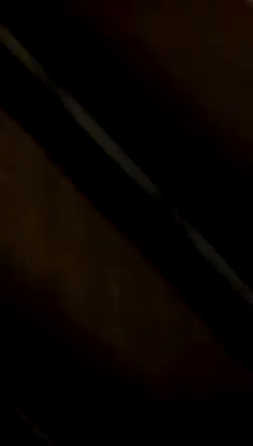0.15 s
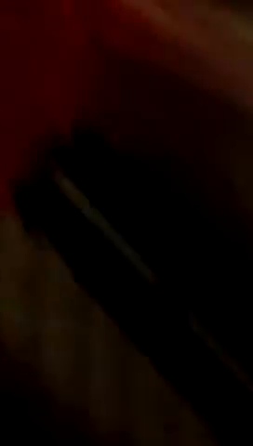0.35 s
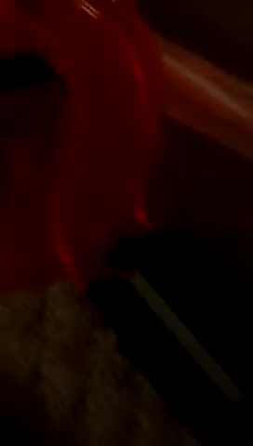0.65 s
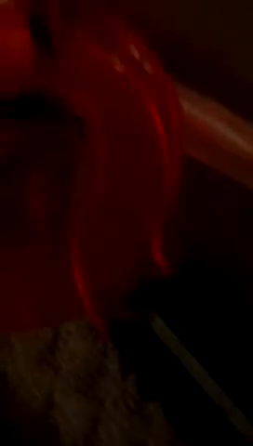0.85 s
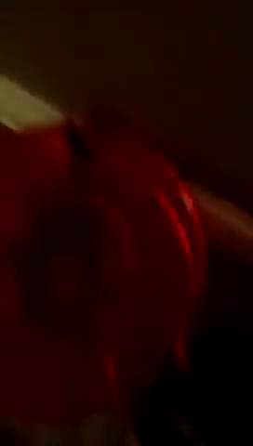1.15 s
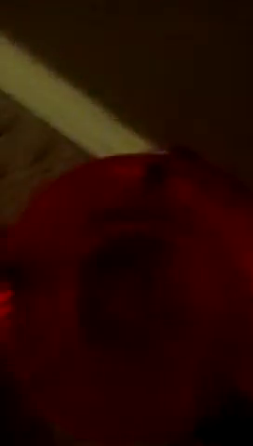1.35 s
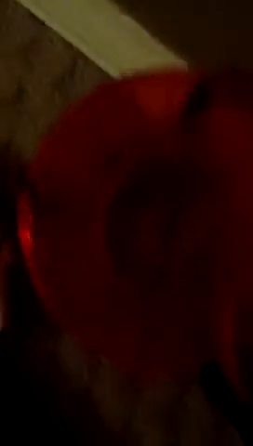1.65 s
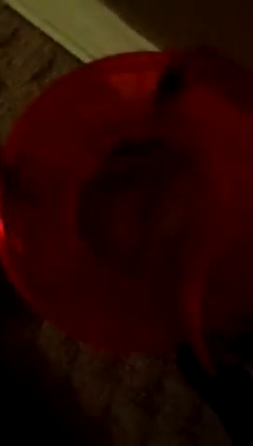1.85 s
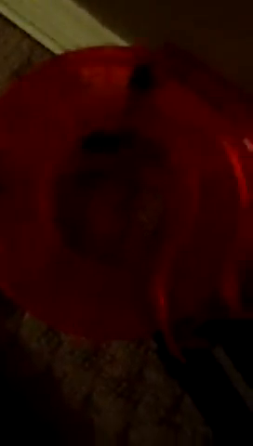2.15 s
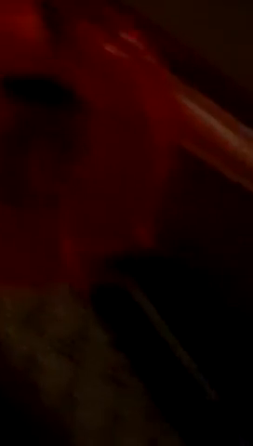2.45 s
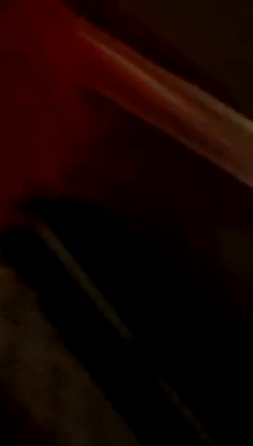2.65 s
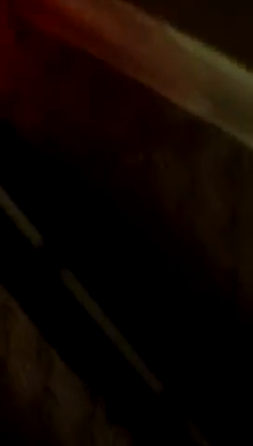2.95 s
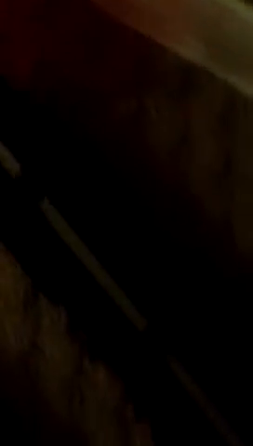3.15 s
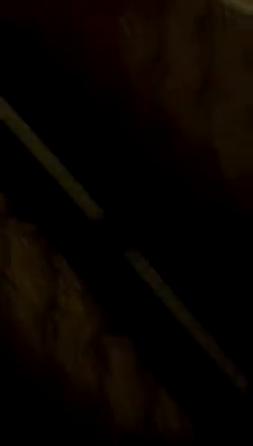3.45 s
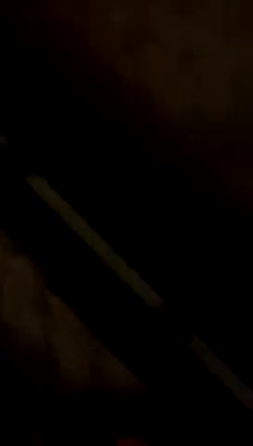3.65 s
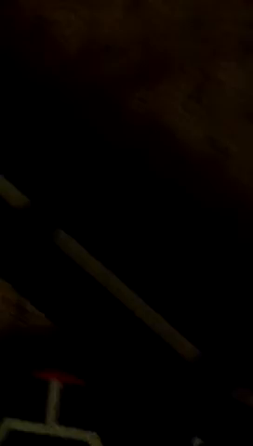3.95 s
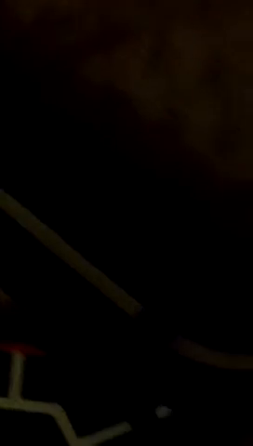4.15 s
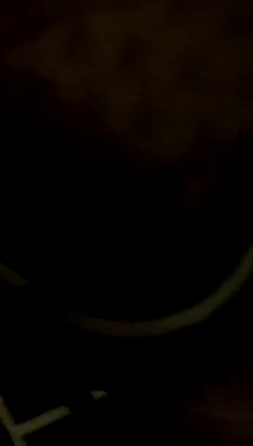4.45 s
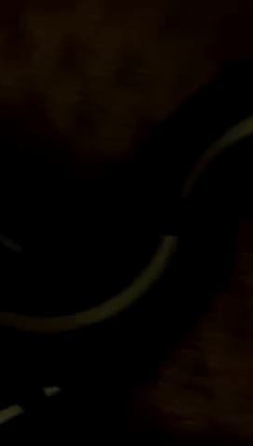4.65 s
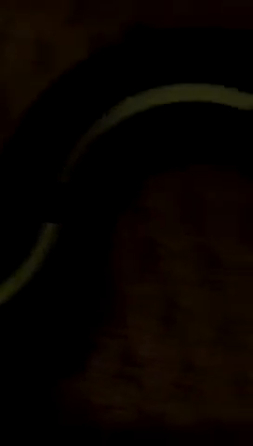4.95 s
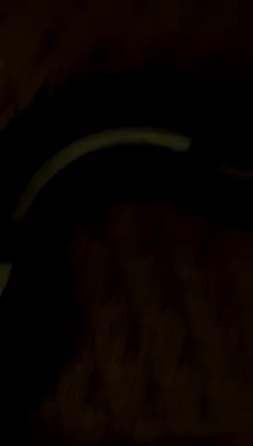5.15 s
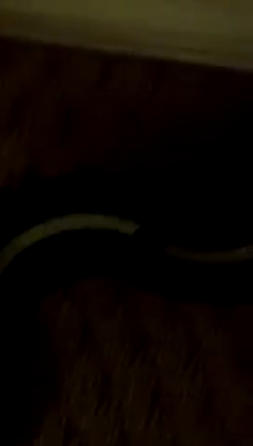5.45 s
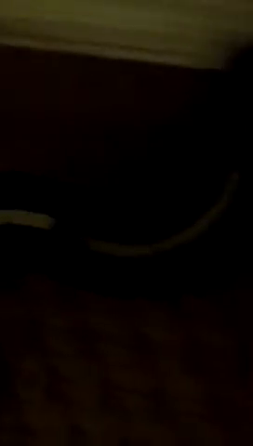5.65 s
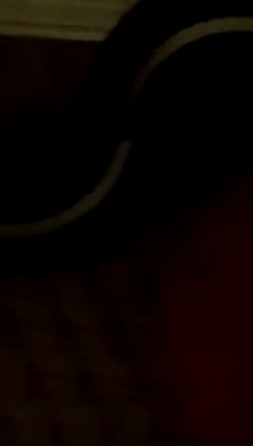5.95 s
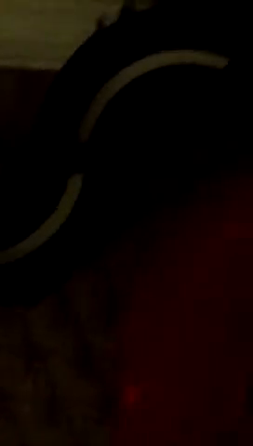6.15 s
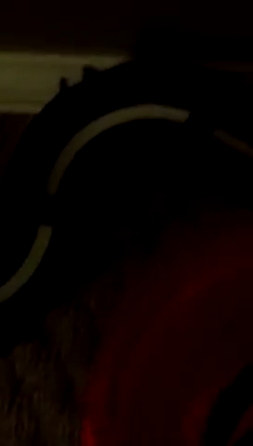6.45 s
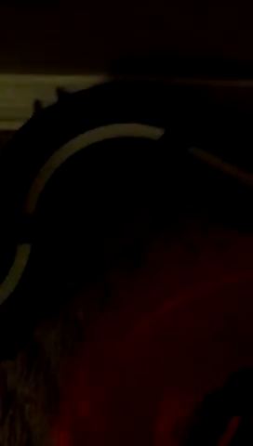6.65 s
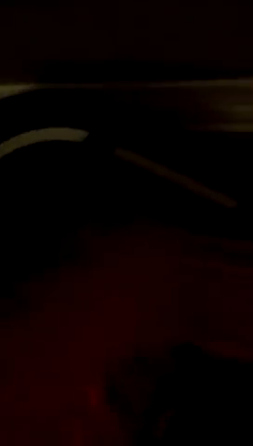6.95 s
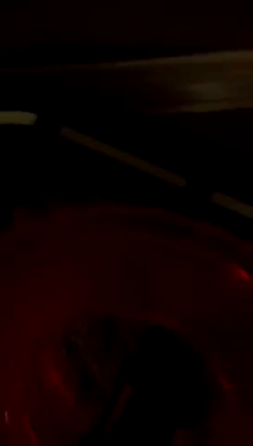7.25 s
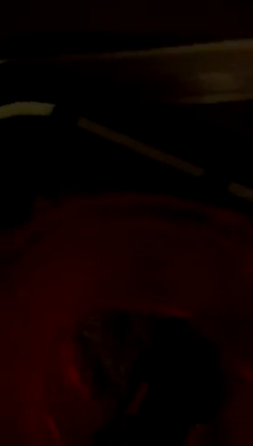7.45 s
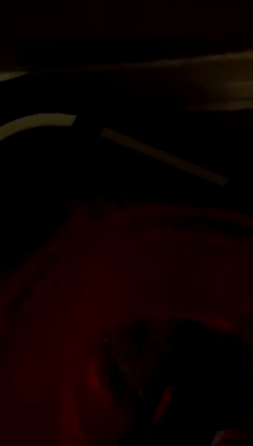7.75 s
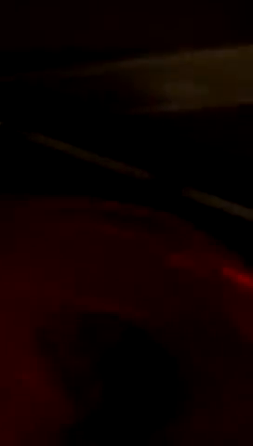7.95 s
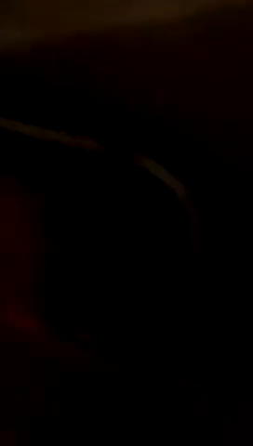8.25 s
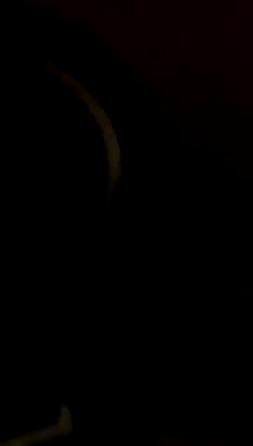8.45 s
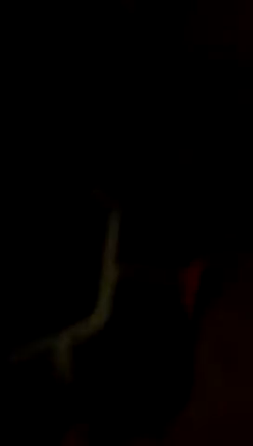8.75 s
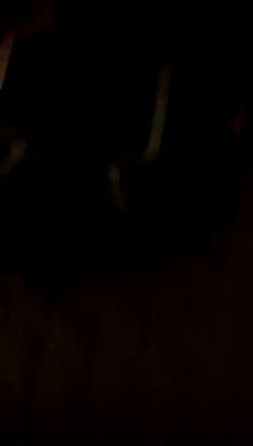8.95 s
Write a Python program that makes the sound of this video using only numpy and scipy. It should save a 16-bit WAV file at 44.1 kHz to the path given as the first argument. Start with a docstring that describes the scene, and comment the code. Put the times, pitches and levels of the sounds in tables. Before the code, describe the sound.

From the start, small vibrating toy robots skitter in hollow plastic tubes: light, uneven clacks and dull thumps about twenty per second, with short skids between, a low buzz of legs on the track and a thin high motor hiss. The rattling grows fuller from 0.5 s, with the strongest clacks around 2.0 to 2.4 s. After about 3.5 s it becomes less direct; a brief loose-joint jangle comes at 4.1 s, and knocks space out slightly around 5 s. At 5.7 and 5.9 s two harder, brighter knocks ring out with gritty jangles as the set is handled. The robots then sound farther off, softer and duller; their running dips for a moment at 7.5 s. Near 8.3 s there is a short gap in the knocks, then sparse taps and small jangles from 8.5 s to the end at 9.1 s. Close microphone, quiet carpeted room, faint background hush.

```python
"""Small vibrating toy robots skitter through plastic tubes in a carpeted room. Throughout, their shells knock
on the walls about twenty times a second (impulses exciting decaying modes) and skid on, their legs buzz on
the track (random contacts) and their motors hiss (resonant noise). Loose joints jangle near 4.1 s and 5.7 s;
two brighter, harder knocks ring out at 5.7 and 5.9 s as the set is handled. The direct swing of the wall
weakens as the robots run off, their running dies down for a moment at 7.5 s, and jangles return from 8.5 s."""
import sys
import numpy as np
from scipy import signal
from scipy.fft import rfft, irfft
from scipy.io import wavfile

SR = 44100
rng = np.random.default_rng(int(sys.argv[2]) if len(sys.argv) > 2 else 0)


def master_out(mix):
    """Clip the mix to full scale and print it as 16-bit PCM to the path in sys.argv[1]."""
    frames = np.transpose(np.atleast_2d(mix))
    ceiling = np.clip(frames, -1, 1)
    pcm = np.round(ceiling * 32767).astype(np.int16)
    wavfile.write(sys.argv[1], SR, pcm)


def volts_from_decibels(level):
    """Turn decibel levels (scalar or array-like) into linear amplitude factors."""
    exponent = np.asarray(level, float) / 20
    return 10 ** exponent


N = 400869   # length [samples]

# Shell against tube wall, levels before each part's trim:
# (time [s], clack pitch [Hz], thump level [dB], clack level [dB], snap level [dB])
KNOCKS = [(0.03, 1750, -44, -50, -55), (0.065, 1430, -39, -46.5, -43.5), (0.113, 3650, -52, -73, -53),
          (0.153, 1250, -47, -53, -55), (0.165, 3000, -41, -36, -45.5), (0.253, 1830, -51, -64, -60),
          (0.285, 1250, -42, -55, -53), (0.33, 1710, -45, -44, -57), (0.366, 1240, -41, -48.5, -45.5),
          (0.409, 1700, -43, -63, -68), (0.448, 2300, -38, -34, -46), (0.507, 2590, -40.5, -51, -50),
          (0.568, 1680, -35.5, -39.5, -49.5), (0.595, 1790, -39, -52, -52),
          (0.629, 1760, -37.5, -39.5, -45.5), (0.676, 1740, -40, -42.5, -42),
          (0.718, 1270, -37.5, -40.5, -43.5), (0.785, 4170, -62, -51, -47), (0.839, 4130, -64, -49, -54),
          (0.85, 1710, -53, -58, -60), (0.88, 1910, -38, -37, -47.5), (0.911, 4080, -50, -52, -55),
          (0.936, 4100, -49, -55, -52.5), (0.983, 1710, -43.5, -59, -66), (1.022, 2130, -39, -33.5, -47.5),
          (1.081, 1690, -34.5, -38.5, -44.5), (1.124, 1310, -38, -40.5, -39.5),
          (1.144, 1240, -40, -58, -51), (1.2, 1290, -36, -46, -42), (1.241, 1290, -35, -44, -53),
          (1.302, 1700, -39, -44, -46), (1.346, 1710, -39.5, -40, -40.5), (1.394, 1280, -38, -43, -46),
          (1.467, 1280, -38, -49, -52), (1.531, 3610, -42.5, -49.5, -47.5), (1.57, 1680, -38.5, -40.5, -40),
          (1.618, 1460, -34.5, -37.5, -54.5), (1.665, 1870, -53, -52, -53),
          (1.695, 2610, -44.5, -48.5, -47.5), (1.723, 1300, -37, -44.5, -50.5),
          (1.816, 1730, -42, -48, -58), (1.843, 1680, -49, -58, -58), (1.871, 2400, -41.5, -50.5, -46.5),
          (1.904, 1290, -37, -48, -52), (1.949, 4040, -66, -45, -47), (1.966, 1710, -38.5, -38, -45),
          (2.002, 1720, -31.5, -26.5, -34), (2.06, 1280, -35.5, -34.5, -44), (2.101, 3790, -52, -53, -51),
          (2.141, 3610, -47, -51, -49), (2.161, 2550, -45, -51, -49), (2.199, 4150, -45.5, -52, -50),
          (2.22, 3620, -42.5, -46, -46), (2.268, 1230, -36, -52, -55), (2.335, 1820, -29, -29, -43.5),
          (2.386, 1710, -35.5, -29, -43), (2.438, 2560, -43.5, -54, -50), (2.485, 2390, -41.5, -39.5, -47),
          (2.53, 4100, -41.5, -49.5, -46), (2.577, 1720, -57, -60, -58), (2.598, 2260, -38, -48, -51),
          (2.64, 2260, -38.5, -53, -60), (2.684, 4230, -55, -51, -39.5), (2.697, 1700, -39, -37.5, -35.5),
          (2.717, 1380, -40, -60, -61), (2.75, 1720, -41.5, -47, -49), (2.779, 1690, -38, -46, -48.5),
          (2.837, 1690, -35.5, -52, -64), (2.881, 2000, -43.5, -48, -47.5), (2.932, 2570, -37, -47, -46),
          (2.99, 1710, -35.5, -30, -39.5), (3.051, 2280, -39.5, -54, -55), (3.08, 2370, -37, -40.5, -56),
          (3.144, 1230, -38, -43, -37.5), (3.2, 1650, -42, -47, -60), (3.243, 1310, -47, -51, -55),
          (3.268, 1710, -43, -50, -61), (3.302, 3640, -72, -52, -44), (3.348, 2330, -36.5, -44.5, -61),
          (3.397, 1660, -44, -51, -68), (3.434, 1270, -35, -46.5, -51), (3.485, 1300, -34.5, -35.5, -53),
          (3.519, 1330, -38.5, -37, -36.5), (3.562, 4090, -41.5, -52, -52), (3.62, 2230, -47, -60, -63),
          (3.666, 1680, -50, -61, -56), (3.685, 4040, -45, -66, -58), (3.746, 1770, -40.5, -57, -57),
          (3.774, 1300, -36.5, -53, -51), (3.797, 2400, -45, -40.5, -53), (3.856, 3500, -45, -54, -57),
          (3.893, 1650, -42.5, -64, -66), (3.948, 1660, -48, -54, -65), (3.981, 1320, -40.5, -51, -54),
          (4.037, 1710, -42.5, -41.5, -53), (4.104, 1350, -35.5, -44.5, -50),
          (4.171, 2920, -37.5, -36, -52), (4.223, 2820, -46.5, -59, -58), (4.275, 2940, -36, -35, -45.5),
          (4.356, 1580, -40, -55, -58), (4.386, 1430, -47, -62, -61), (4.437, 1440, -32, -42, -43.5),
          (4.505, 3570, -39, -34.5, -49), (4.537, 1360, -41.5, -38, -49), (4.582, 2450, -50, -44, -59),
          (4.627, 2270, -43, -52, -57), (4.648, 1430, -41, -56, -61), (4.704, 3710, -44.5, -47.5, -46),
          (4.761, 2160, -41.5, -44, -51), (4.827, 2800, -36.5, -31, -40), (4.869, 2430, -33, -32, -48),
          (4.978, 2300, -38.5, -37.5, -52), (5.088, 3600, -37.5, -49, -47.5),
          (5.199, 3100, -41, -36.5, -46.5), (5.266, 1680, -41, -46.5, -48), (5.302, 4070, -43.5, -61, -59),
          (5.33, 1680, -55, -65, -51), (5.372, 2280, -39.5, -61, -72), (5.408, 2020, -39.5, -45, -58),
          (5.452, 2160, -49, -39.5, -51), (5.506, 2630, -44, -43, -59), (5.561, 2330, -45, -58, -54),
          (5.608, 1870, -35.5, -38, -38.5), (5.686, 1310, -41, -46, -49), (5.716, 2050, -38, -21, -23),
          (5.828, 1360, -39.5, -45, -48), (5.866, 1700, -41.5, -24, -23.5), (5.992, 1840, -41.5, -43, -52),
          (6.052, 2100, -45.5, -62, -62), (6.106, 2320, -52, -64, -64), (6.143, 1400, -41, -67, -61),
          (6.278, 1420, -44, -47, -58), (6.316, 2290, -43.5, -52, -53), (6.344, 2320, -47.5, -52, -57),
          (6.388, 1710, -39.5, -55, -50), (6.464, 2570, -51, -73, -68), (6.481, 1340, -42.5, -60, -63),
          (6.528, 1800, -35.5, -39, -48.5), (6.594, 1480, -37, -49, -58), (6.637, 1840, -43.5, -58, -65),
          (6.69, 1650, -42, -63, -59), (6.746, 1510, -46.5, -64, -69), (6.822, 2560, -36, -55.5, -50),
          (6.887, 2640, -37.5, -39, -51), (6.948, 1320, -37.5, -49, -52), (6.98, 1400, -40, -53, -55),
          (7.016, 2200, -37.5, -50, -53), (7.079, 2770, -38.5, -55, -42), (7.107, 1350, -41, -56, -53),
          (7.144, 1230, -42, -65, -62), (7.198, 1320, -43.5, -64, -63), (7.246, 1500, -36.5, -34, -45),
          (7.298, 1530, -51, -57, -64), (7.344, 1510, -46, -46, -62), (7.402, 1960, -43, -50.5, -58),
          (7.441, 1770, -48, -59, -70), (7.461, 1480, -45, -68, -68), (7.529, 2290, -45, -57, -68),
          (7.552, 1830, -42, -45.5, -52), (7.619, 2290, -42, -43, -51), (7.709, 1900, -46, -47, -58),
          (7.749, 1310, -45, -55, -55), (7.842, 1290, -42, -56, -74), (7.88, 1480, -35.5, -31, -51),
          (7.917, 1500, -43, -52, -57), (7.946, 1240, -41, -52, -43.5), (8.062, 2500, -41, -66, -73),
          (8.1, 1810, -45, -43, -53.5), (8.173, 1360, -42, -41.5, -52.5), (8.214, 2370, -45, -64, -65),
          (8.273, 1750, -48.5, -76, -59), (8.537, 1390, -43, -54, -69), (8.554, 1490, -46, -54, -72),
          (8.669, 2300, -45, -38, -41.5), (8.71, 3160, -56, -42, -52), (8.804, 1480, -54.5, -64, -67),
          (8.895, 1490, -48.5, -65, -74), (8.951, 2320, -43.5, -39.5, -38.5), (9.009, 4100, -42, -47, -48),
          (9.034, 3020, -57, -43, -47)]
# Pitch regions of thump, clack and snap: (frequency [Hz])
KNOCK_REGIONS = [800, 2400, 8000]
# Modes of the tube: (frequency [Hz], relative level [dB], undamped decay time t60 [s])
TUBE_MODES = [(187, 0.5, 0.065), (298, -8, 0.14), (361.2, -7, 0.085), (436, -6.5, 0.073),
              (518, -1.5, 0.059), (607.4, -1.5, 0.054), (717.6, -0.5, 0.063), (852.3, 5, 0.052),
              (994.5, -5.5, 0.12), (1305, -8, 0.06), (1480, -10, 0.071), (1710, -2.5, 0.028),
              (1820, -10, 0.062), (2308, 0.5, 0.027), (2589, -7, 0.047), (2860, 1, 0.013),
              (3590, 4.5, 0.011), (4060, 4.5, 0.0087), (4887, -3, 0.019), (5495, -1, 0.015),
              (6030, 0.5, 0.013), (6520, 3.5, 0.0078), (7280, 4.5, 0.0055), (7970, 0.5, 0.012),
              (8760, 1.5, 0.012), (9720, 8, 0.0052), (10940, 3.5, 0.0074), (11740, -1, 0.009),
              (13170, 5, 0.0073), (15300, -3, .005)]
# The robots' running, before each layer's trim:
# (time [s], track hum level [dB], leg buzz and rattle level [dB], motor hiss level [dB])
RUNNING = [(0.0, -61.5, -53.5, -59), (0.58, -55, -53.5, -64), (0.68, -56.5, -57, -58),
           (1.32, -60.5, -60.5, -61), (2.91, -56, -58.5, -59), (3.19, -59, -55, -60),
           (3.52, -54.5, -56.5, -63), (4.15, -60.5, -57.5, -70), (5.24, -57.5, -57, -66),
           (5.8, -60, -54, -64), (6.1, -59.5, -59.5, -63.5), (7.06, -60, -58.5, -72),
           (7.74, -57, -56.5, -70), (8.08, -59.5, -57.5, -68), (8.25, -64, -62, -72), (8.48, -58, -65, -73),
           (8.63, -60.5, -70, -72), (9.09, -67, -51, -70)]
# Hiss resonances of the motors: (frequency [Hz], width [Hz], relative level [dB])
MOTOR_RESONANCES = [(7030, 450, -9), (9550, 320, -8), (14400, 1200, 4.5), (14500, 620, -11)]
# Spectral shape of quiet room and microphone: (frequency [Hz], relative density [dB per Hz])
HUSH_SPECTRUM = [(18, -60), (30, -17), (88, 1.5), (213, 10), (359, 4), (443, -10.5), (2550, -7.5),
                 (3150, -10.5), (4420, -7), (5310, -7.5), (15500, -6.5)]
# Reverberation of the room: (frequency [Hz], decay time t60 [s])
ROOM_DECAY = [(200, 0.54), (800, 0.073), (3000, 0.22), (8000, 0.11), (14000, 0.28)]
# Joints jangling and scraping when the set is jolted:
# (time [s], length [s], low grit level [dB], high grit level [dB], fall [dB])
JANGLES = [(4.119, 0.028, -45, -54.5, 18), (5.729, 0.074, -45, -46, 14), (5.878, 0.099, -42.5, -46.5, 18.5),
           (8.525, 0.15, -54, -68.5, 4), (8.706, 0.078, -45.5, -54.5, 12), (9.001, .05, -47, -55.5, 6)]
# Resonance of the stretch of track under the legs: (time [s], frequency [Hz])
TRACK_PITCH = [(0.0, 294), (0.9, 292), (1.2, 340), (3.3, 336), (3.5, 297), (4.2, 295), (4.6, 334),
               (5.9, 343), (6.1, 366), (9.09, 363)]
# First swing of the wall coming straight across, as the robots run off: (time [s], gain before trim [dB])
DIRECT_SWING = [(0.0, 18.5), (0.7, 25), (3.5, 21.5), (3.8, 15), (5.0, 14.5), (5.8, 13.5), (7.0, 12),
                (9.09, 8)]


def amp_of_rows(rows):
    """Linear interpolation of levels in dB, each column given as a gain per sample."""
    time_s, *columns = np.transpose(rows)
    return [volts_from_decibels(np.interp(np.arange(N) / SR, time_s, column)) for column in columns]


def rms_one(x):
    """Normalisation to unit root-mean-square."""
    return x / np.sqrt(np.mean(x ** 2) + 1e-20)


def at_hz(points, hz):
    """Linear interpolation of a spectrum on a log-frequency axis."""
    point_hz, values = np.transpose(points)
    return np.interp(np.log(hz), np.log(point_hz), values)


def drift(corner_hz):
    """Low-passed noise: a random fluctuation of rms 1, slow against the sound."""
    step = 40   # samples between computed points
    pole = np.exp(-2 * np.pi * corner_hz * step / SR)
    noise = rng.standard_normal(N // step + 2002)
    slow = signal.lfilter([1], [1, -2 * pole, pole ** 2], noise)[2000:]   # skip the settling
    return np.interp(np.arange(N) / step, np.arange(len(slow)), rms_one(slow))


def ring(clicks, hz, t60):
    """Impulse response of a damped resonator: a unit click starts a decaying sine of height 1."""
    radius = volts_from_decibels(-60 / (max(t60, .003) * SR))
    angle = 2 * np.pi * hz / SR
    return signal.lfilter([0, np.sin(angle)], [1, -2 * radius * np.cos(angle), radius ** 2], clicks + 1e-18)


def decay(starts, time_constant_s):
    """Exponential relaxation: each start value decays with the given time constant."""
    return signal.lfilter([1], [1, -np.exp(-1 / (time_constant_s * SR))], starts + 1e-18)


def band(x, low_hz, high_hz):
    """Band-pass filtering by a Butterworth design of order 2."""
    return signal.sosfilt(signal.butter(2, [low_hz, high_hz], "band", fs=SR, output="sos"), x)


def taps(per_s, low_hz, high_hz, uneven_db, clump_db, damping):
    """Random excitation: dense contacts dealt among damped tube modes between two pitches; rms 1."""
    unevenness = uneven_db * np.minimum(rng.exponential(1, N), 4)
    sizes = volts_from_decibels(unevenness + clump_db * drift(25.3))
    sizes *= rng.choice([-1, 1], N) * (rng.random(N) < per_s / SR)
    dealt = rng.integers(0, 3, N)   # each contact excites every third mode only
    total = np.zeros(N)
    for k, (hz, level_db, t60) in enumerate(TUBE_MODES):
        if low_hz < hz < high_hz:
            total += volts_from_decibels(level_db) * ring(sizes * (dealt == k % 3), hz, t60 / damping)
    return rms_one(total)


def colour_db(rows, hz, favour_db):
    """Position-dependent excitation: the spot struck favours pitches near each knock's clack pitch."""
    broad_db = np.array([np.interp(np.log(hz), np.log(KNOCK_REGIONS), row[2:]) for row in rows])
    brightness_db = np.maximum(rows[:, 4] - rows[:, 2], 0)
    broad_db -= 0.45 * brightness_db * max(np.log2(hz / 9000), 0) ** .5   # bright blows lack the very top
    return broad_db + favour_db * np.exp(-(np.log(hz / rows[:, 1]) / 0.1) ** 2)


def struck_modes(rows, at, mode_db, spread_db):
    """Modal excitation: each blow rings the tube's modes with fresh strengths and delays."""
    out = np.zeros(N)
    for hz, level_db, t60 in TUBE_MODES:
        strength_chance, late_chance, bounce_chance = rng.standard_normal((3, len(rows)))
        struck_db = colour_db(rows, hz, favour_db=8.5) + spread_db * strength_chance + level_db + mode_db
        strength = min(1, hz / 600) ** 1.63 * volts_from_decibels(struck_db)   # a light shell hardly moves the lowest modes
        # modes answer as the wall swings back, then the shell touches a second time
        late = (SR * (0.00065 + np.abs(late_chance) * 0.0011)).astype(int)
        bounce = (SR * (.004 + np.abs(bounce_chance) * .003)).astype(int)
        clicks = np.zeros(N + SR)
        clicks[at + late] = strength
        clicks[at + bounce] = 0.34 * strength * np.sign(bounce_chance)
        out += ring(clicks[:N], hz, t60)
    return out


def wall_push(rows, at, push_db):
    """Contact impulse: one inward swing of the wall, shorter for a harder contact."""
    power = volts_from_decibels(rows[:, 2:]) ** 2
    share = power / np.sum(power, axis=1, keepdims=True)   # of thump, clack and snap
    # heavy and hard blows swing most
    swing_db = .5 * (rows[:, 2] + rows[:, 4]) + np.interp(rows[:, 0], *np.transpose(DIRECT_SWING))
    t = np.arange(-60, 61) / SR
    out = np.zeros(N)
    for column, hz in enumerate([750, 1500]):
        push = np.zeros(N)
        push[at] = volts_from_decibels(swing_db + push_db) * share[:, column]
        swing = np.cos(2 * np.pi * hz * t) * np.exp(-(2.0 * hz * t) ** 2)
        out -= np.convolve(push, swing)[30:N + 30]   # peaks 30 samples after contact
    return out


def crack_and_chatter(rows, at, crack_db, crack_s, chatter_db, chatter_s):
    """Noise radiation at contact: a short crack and a grainy chatter, decaying band by band."""
    white = rng.standard_normal(N)
    grit = rng.standard_normal(N) * (rng.random(N) < 1200 / SR)   # about 1200 grains per second
    out = np.zeros(N)
    for k, hz in enumerate(500 * 2 ** np.arange(0, 5, .6)):
        burst = np.zeros(N + SR)
        level_db = colour_db(rows, hz, favour_db=4) + 3.9 * rng.standard_normal(len(rows)) - 0.23 * k
        burst[at + int(.0008 * SR)] = volts_from_decibels(level_db)
        chatter_band_s = chatter_s * (1900 / hz) ** 0.48   # treble chatter dies sooner
        for db, seconds, noise in [(crack_db, crack_s, white), (chatter_db, chatter_band_s, grit)]:
            out += volts_from_decibels(db) * decay(burst[:N], seconds) * rms_one(band(noise, hz / 1.23, hz * 1.23))
    return out


def knocks():
    """Impact of shell on wall: an inward push, a short crack, a grainy chatter and the tube's modes."""
    rows = np.array(KNOCKS)
    at = ((rows[:, 0] + .0014) * SR).astype(int)   # the contact takes a moment to build
    return (struck_modes(rows, at, mode_db=-8, spread_db=2.5)
            + wall_push(rows, at, push_db=-3.5)
            + crack_and_chatter(rows, at, crack_db=-6.5, crack_s=.002, chatter_db=-15.5, chatter_s=0.012))


def skitter():
    """Sliding friction: after each knock the shell skids on, clearest when the robots are far."""
    rows = np.array(KNOCKS)
    direct_db = np.interp(rows[:, 0], *np.transpose(DIRECT_SWING))
    start = np.zeros(N)
    start[((rows[:, 0] + .006) * SR).astype(int)] = volts_from_decibels(rows[:, 2] - 8 - 0.67 * direct_db)
    fade = decay(start, 0.026)
    return fade * taps(600, 250, 1900, uneven_db=3.0, clump_db=2.0, damping=2.3)


def leg_buzz(legs):
    """Repeated contact: legs drum on the track as a low buzz and a brighter rattle in damped modes."""
    buzz = taps(450, 450, 1600, uneven_db=2.5, clump_db=3.5, damping=3.2)
    rattle = taps(2500, 1100, 9000, uneven_db=1.5, clump_db=5.0, damping=3.8)
    return legs * (volts_from_decibels(-6.5) * buzz + volts_from_decibels(-8.5) * rattle)


def track_hum(favour_db):
    """Selective resonance: legs shake the lowest modes, most the one nearest the track's pitch; rms 1."""
    centre_hz = np.interp(np.arange(N) / SR, *np.transpose(TRACK_PITCH))
    hum = np.zeros(N)
    for hz, level_db, _ in TUBE_MODES[:4]:
        favoured_db = level_db + favour_db * np.exp(-(np.log(hz / centre_hz) / 0.057) ** 2)
        mode = taps(900, hz - 1, hz + 1, uneven_db=1.0, clump_db=2.0, damping=0.93)
        hum += volts_from_decibels(favoured_db) * mode
    return rms_one(hum)


def jangles():
    """Loose-joint collisions: gritty runs of small contacts start with each jolt and fade as joints settle."""
    edge_s, silent_db = 0.01, -99
    rows = []
    for start, length, low_db, high_db, fall_db in JANGLES:
        end = start + length
        rows += [(start - edge_s, silent_db, silent_db), (start, low_db, high_db),
                 (end, low_db - fall_db, high_db - fall_db), (end + 2 * edge_s, silent_db, silent_db)]
    low, high = amp_of_rows(rows)
    return (low * taps(1300, 400, 2000, uneven_db=3.0, clump_db=-4.5, damping=3.6)
            + high * taps(1800, 1400, 10000, uneven_db=5.0, clump_db=-1.0, damping=1.5))


def motors():
    """Resonant filtering of noise: brush hiss flickers in the resonances of the small shells; rms 1."""
    hiss = np.zeros(N)
    for hz, width, level_db in MOTOR_RESONANCES:
        flicker_db = 2.0 * drift(25) + 0.98 * drift(3.1)
        noise = band(rng.standard_normal(N), hz - width / 2, hz + width / 2)
        hiss += volts_from_decibels(level_db + flicker_db) * rms_one(noise)
    return rms_one(hiss)


def room(x):
    """Diffuse reverberation: a noise tail dies band by band and swells when the wall answers."""
    t = np.arange(SR // 2) / SR
    edges = 140 * 2 ** np.arange(0, 7, .75)
    tail = np.zeros(len(t))
    for low, high in zip(edges, edges[1:]):
        t60 = at_hz(ROOM_DECAY, np.sqrt(low * high))
        tail += band(rng.standard_normal(len(t)), low, high) * volts_from_decibels(-60 * t / t60)
    tail *= np.clip(t / 0.019, 0, 1) * volts_from_decibels(1.5 * (t > 0.023))   # wall answers 23 ms on, 1.5 dB up
    return signal.fftconvolve(x, volts_from_decibels(-17) * tail / np.sqrt(np.sum(tail ** 2)))[:N]


def hush():
    """Stationary background noise: room and microphone, white noise shaped by a fixed spectrum."""
    hz = np.maximum(np.fft.rfftfreq(N, 1 / SR), 1)
    shaped = irfft(rfft(rng.standard_normal(N)) * volts_from_decibels(at_hz(HUSH_SPECTRUM, hz)), N)
    return volts_from_decibels(-64.5) * rms_one(shaped)


def scene():
    """Superposition: tube sounds and their reverberation add to motor hiss and hush."""
    hum, legs, hiss = amp_of_rows(RUNNING)
    # the running dies down for a moment
    pause_at_s, pause_s, pause_db = 7.5, 0.045, -13.5
    pause = volts_from_decibels(pause_db * np.exp(-((np.arange(N) / SR - pause_at_s) / pause_s) ** 2))
    tube = knocks() + skitter() + leg_buzz(pause * legs)
    tube += volts_from_decibels(1.0) * pause * hum * track_hum(favour_db=7.5)
    tube += jangles()
    tube = signal.sosfilt(signal.butter(4, 160, "high", fs=SR, output="sos"), tube)   # thin tubes radiate no bass
    return (tube + room(tube) + volts_from_decibels(-4.5) * hiss * motors() + hush())[None]


def low_pass(x):
    """Removes everything above the highest recorded frequency."""
    return signal.sosfilt(signal.butter(12, 16520, fs=SR, output="sos"), x)


def record(dry):
    """Band limitation: the microphone cuts the bass gently and a steep low-pass cuts the top."""
    x = signal.sosfilt(signal.butter(1, 60, "high", fs=SR, output="sos"), dry)
    x = signal.sosfilt(signal.cheby2(8, 30, 15600, fs=SR, output="sos"), x)   # 30 dB down from 15600 Hz
    return low_pass(x)


dry = scene()
out = record(dry)
master_out(out)
```